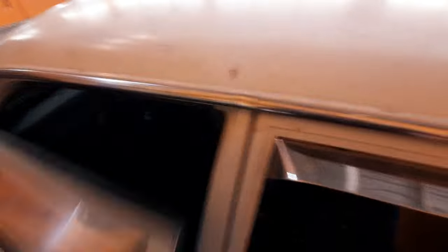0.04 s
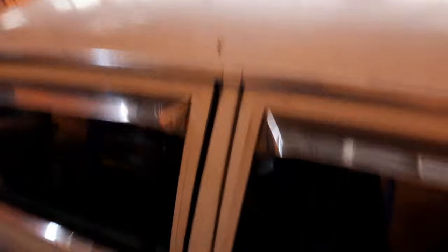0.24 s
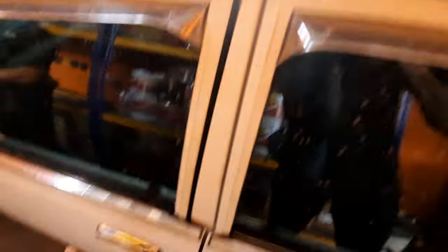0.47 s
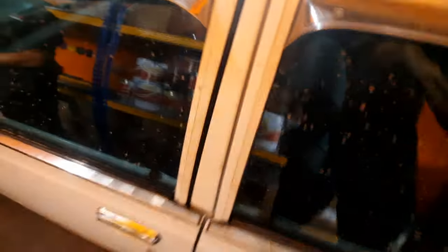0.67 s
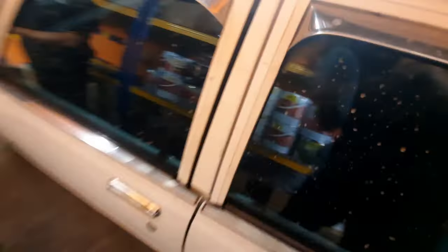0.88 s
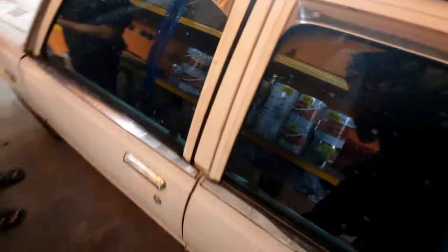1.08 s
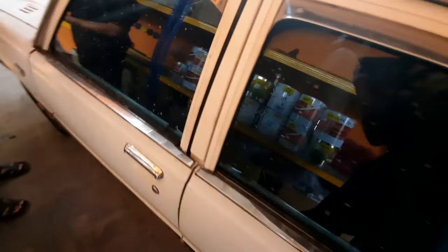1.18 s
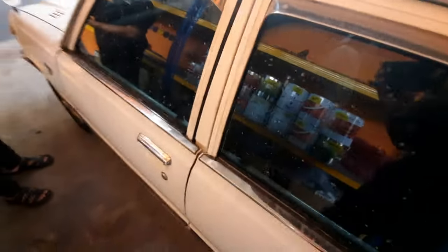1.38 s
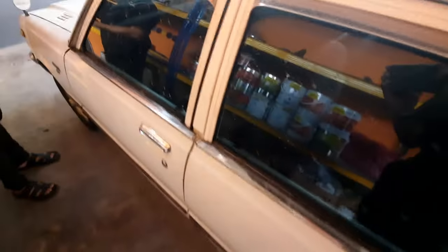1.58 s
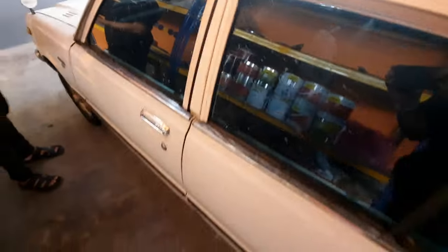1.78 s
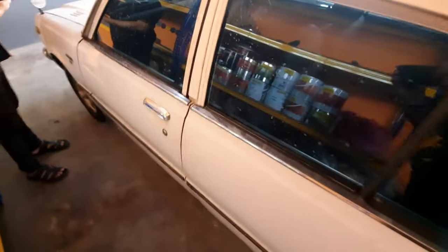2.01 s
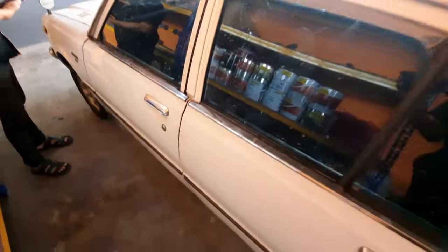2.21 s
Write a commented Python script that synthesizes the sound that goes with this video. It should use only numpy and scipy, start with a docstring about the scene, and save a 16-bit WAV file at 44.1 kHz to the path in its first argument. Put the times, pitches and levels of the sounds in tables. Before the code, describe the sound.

One solid car door slam with a latch clack, ringing out through a big hall.

```python
"""Old car door slammed in a workshop

One slam, close by: the latch snaps over its striker, the door lands on the body and booms,
and loose parts rattle. The large hall rings on over rumble, hiss and a low machine hum,
with a few faint scuffs and ticks."""
import sys
import numpy as np
from scipy import signal
from scipy.fft import rfft, irfft
from scipy.io import wavfile

SR = 44100
rng = np.random.default_rng(int(sys.argv[2]) if len(sys.argv) > 2 else 0)


def bounce(signal):
    """Save signal as a 16-bit WAV file at the path given by the first command-line argument."""
    frames = np.transpose(np.atleast_2d(signal))
    limited = np.clip(frames, -1, 1)
    pcm = np.round(limited * 32767).astype(np.int16)
    wavfile.write(sys.argv[1], SR, pcm)


N = 99225
T, HZ = np.arange(N) / SR, np.fft.rfftfreq(N, 1 / SR)
BODY_PAN_DB, ROOM_PAN_DB = 2, 2  # left over right


def amp(db):
    """Decibels to gain."""
    return 10 ** (np.asarray(db) / 20)


def unit(x):
    """Scales to rms 1."""
    return x / np.sqrt(np.mean(x ** 2) + 1e-20)


def read(points, hz):
    """Reads a table on a log-frequency axis."""
    f, value = np.transpose(points)
    return np.interp(np.log(hz + 1), np.log(f), value)


def pan(db):
    """Stereo gains, the left louder by db."""
    return amp([[db / 2], [-db / 2]])


def add(mix, start, sound):
    """Mixes a sound in at a start in seconds."""
    part = mix[:, max(round(start * SR), 0):][:, :sound.shape[-1]]
    part += sound[..., :part.shape[1]]


def noise(colour, width):
    """Stereo noise with a given spectrum and width, rms 1."""
    mid, side = colour * np.exp(2j * np.pi * rng.random((2, len(HZ))))
    share = amp(read(width, HZ))
    return unit(irfft(np.array([mid + share * side, mid - share * side]) / np.hypot(1, share), N))


def waver(hz):
    """A random drift up to about hz, rms 1."""
    return unit(irfft(np.exp(-(HZ / hz) ** 2 + 2j * np.pi * rng.random(len(HZ))), N))


def rise(seconds):
    """Soft attack."""
    return 1 - np.exp(-T / seconds)


def fade(t60):
    """Falls by 60 dB every t60 seconds."""
    return np.exp(-np.log(1000) * T / t60)


def die_away(x, t60s):
    """Lets each octave decay at its own speed."""
    centres, spectrum = np.geomspace(32, 16384, 10), rfft(x)
    out = np.zeros_like(x)
    for hz in centres:
        band = read([(centre, centre == hz) for centre in centres], HZ)
        out += irfft(spectrum * band, N) * fade(read(t60s, hz))
    return out


def hump(hz, octaves):
    """A broad spectral peak."""
    return np.exp(-.5 * (np.log2((HZ + 1) / hz) / octaves) ** 2)


# Colour of the room tone. Each row: frequency in Hz, relative level in dB.
ROOM_COLOUR = [(15, -54.5), (25, -22), (71, -12), (113, -2), (144, -13.5), (178, -8.5), (240, -14),
               (331, -15.5), (537, -24), (648, -21), (1240, -28), (2230, -27), (6920, -40), (9300, -46),
               (15500, -39)]
# Its fader rides. Each row: time in seconds, rumble in dB, hiss in dB.
ROOM_LEVELS = [(0, -44, -53.5), (.13, -42, -48), (.5, -43.5, -53.5), (.98, -48.5, -61), (1.12, -52, -54.5),
               (1.42, -49, -58.5), (1.54, -50, -55.5), (1.66, -45, -53), (1.9, -43.5, -51.5),
               (2.02, -44.5, -51.5), (2.25, -44, -49.5)]
# Stereo width of the hall. Each row: frequency in Hz, side against mid in dB.
HALL_WIDTH = [(80, -22), (300, -12.5), (1000, 1), (3000, 0), (14000, 0)]


def room_tone():
    """The workshop's bed of rumble and distant hiss."""
    times, rumble_db, hiss_db = np.transpose(ROOM_LEVELS)
    colour = amp(read(ROOM_COLOUR, HZ))
    low_share = 1 / (1 + (HZ / 760) ** 4)  # crossover at 760 Hz
    rumble = amp(np.interp(T, times, rumble_db)) * noise(colour * np.sqrt(low_share), HALL_WIDTH)
    hiss = amp(np.interp(T, times, hiss_db)) * noise(colour * np.sqrt(1 - low_share), HALL_WIDTH)
    return rumble + hiss


# Tones of the machine. Each row: pitch in Hz, relative level in dB.
HUM_TONES = [(117, 3), (327, -10), (644, -16), (2300, -25)]
# The hum's fader ride. Each row: time in seconds, level in dB.
HUM_LEVELS = [(0, -45.5), (.1, -47), (.16, -39), (.3, -49), (1.0, -53), (1.5, -50.5), (1.8, -46.5),
              (2.25, -46)]


def machine_hum(drift_hz=7.34, flutter=0.49, rate_hz=13.05):
    """A machine hums in the hall, each tone wavering in level and pitch."""
    tones = np.zeros(N)
    for hz, db in HUM_TONES:
        level = amp(db) * (1 + flutter * waver(rate_hz))
        pitch = hz + drift_hz * waver(rate_hz)
        tones += level * np.sin(2 * np.pi * np.cumsum(pitch) / SR)
    return amp(np.interp(T, *np.transpose(HUM_LEVELS))) * unit(tones)


# Hits of the latch and loose parts. Each row: start in seconds, level in dB, t60 in seconds,
# pan to the left in dB, treble tilt in dB per octave.
LATCH_HITS = [(0.1828, -49, .025, 4, 0), (0.1955, -46, .025, 2, 0), (0.2036, -12, .035, 3, 1),
              (0.2068, -13, .03, 1, 1.5), (0.2110, -17, .025, 2, 3), (0.2215, -15, .02, 1, -2.5),
              (0.2295, -23, .05, 0, -1), (0.2685, -30, .03, 0, -4), (0.3020, -28, .05, 0, -5),
              (0.2485, -18.5, .045, 2, -1), (0.2745, -26, .022, 0, -3), (0.2960, -22, .022, 0, -1.5),
              (0.3328, -30.5, .022, 1, .5)]
# Colour of the steel's crack. Each row: frequency in Hz, relative level in dB.
LATCH_COLOUR = [(200, -11), (900, -4), (2000, 1.5), (3300, -5), (4500, 2.5), (7000, -1.5), (9300, -10),
                (11600, -2.5), (12800, -9), (14400, -12), (15800, -29)]
# Ring of the steel. Each row: pitch in Hz, relative level in dB, t60 in seconds.
LATCH_MODES = [(2170, -21, .14), (3830, -24, .12), (4600, -20, .1), (5268, -18, .12), (6200, -21, .1),
               (7220, -21, .1), (7860, -22, .1), (11450, -21, .06), (14390, -22, .08)]
# Stereo width up close. Each row: frequency in Hz, side against mid in dB.
CLOSE_WIDTH = [(80, -9), (400, -7.5), (1000, -3.5), (2500, 4), (6000, -5), (14000, -5.5)]


def latch(ring_db=-4):
    """The latch and loose parts clack, steel on steel, each hit leaving a thin ring."""
    out = np.zeros((2, N))
    treble_octaves = np.log2(np.maximum(HZ / 1024, 1))
    for start, db, t60, pan_db, tilt in LATCH_HITS:
        colour = amp(read(LATCH_COLOUR, HZ) + tilt * treble_octaves)
        crack = fade(t60) * noise(colour, CLOSE_WIDTH)
        ring = sum(amp(mode_db) * fade(mode_t60) * np.sin(2 * np.pi * (hz * T + rng.random((2, 1))))
                   for hz, mode_db, mode_t60 in LATCH_MODES)
        add(out, start, amp(db) * pan(pan_db) * rise(0.00024) * (crack + amp(ring_db) * ring))
    return out


# The door meets seal, striker and body, then rocks. Each row: start in seconds, panel level in dB,
# ring level in dB, knock level in dB, knock pitch in Hz.
DOOR_BLOWS = [(0.1831, -29.5, -48.5, -19.5, 292), (0.2047, -14, -35.5, -23, 700),
              (0.2208, -10, -21, -8, 840), (0.2300, -16, -19, -4, 324), (0.2579, -17, -29, -7.5, 134),
              (0.2775, -20.5, -33, -14.5, 260)]
# Colour of the sheet metal. Each row: frequency in Hz, relative level in dB.
PANEL_COLOUR = [(30, -20), (70, -3), (170, -4.5), (320, 1.5), (480, -3.5), (650, -9.5), (1000, -12.5),
                (1600, -11.5), (3000, -20.5), (8000, -38)]
# Its decay. Each row: frequency in Hz, t60 in seconds.
PANEL_DECAY = [(60, 0.54), (300, 0.19), (900, 0.12), (4000, 0.18)]
# Modes of door and body, one list each: pitch in Hz, relative level in dB, t60 in seconds.
BODY_HZ = [68, 97, 139, 211, 272, 315, 337, 405, 521, 856, 902, 1053, 1195, 1287, 1469]
BODY_DB = [-19, -13, -9, -8, -4, -1.5, -7, -9.5, 0, -15.5, -11, -23, -20, -22.5, -15]
BODY_T60 = [.3, .3, 0.43, 0.31, .4, 0.49, .35, 0.34, 0.23, 0.21, 0.26, .35, 0.25, .3, 0.19]


def door(knock_peak_cycles=0.78):
    """Each blow gives a hard knock, shakes the sheet metal and rings the same body modes."""
    out = np.zeros((2, N))
    ring = sum(amp(db) * fade(t60) * np.sin(2 * np.pi * hz * T)
               for hz, db, t60 in zip(BODY_HZ, BODY_DB, BODY_T60))
    for start, panel_db, ring_db, knock_db, knock_hz in DOOR_BLOWS:
        panel = die_away(noise(amp(read(PANEL_COLOUR, HZ)), CLOSE_WIDTH), PANEL_DECAY)
        metal = rise(0.00091) * (amp(panel_db) * panel + amp(ring_db) * ring)
        age = T * knock_hz / knock_peak_cycles  # 1 at the top of the envelope
        knock = age ** 2 * np.exp(1 - age ** 2) * np.sin(2 * np.pi * knock_hz * T)
        add(out, start, metal + amp(knock_db) * knock)
    return out * pan(BODY_PAN_DB)


# The weight under the slam, and its low echo back from the hall. Each row: start in seconds, level in dB, pitch
# in Hz, length in seconds.
AIR_SWELLS = [(0.205, -16.5, 79.8, 0.043), (0.248, -17.5, 67.6, 0.051), (0.284, -16, 63.5, .055),
              (0.47, -27.5, 66, .055)]


def booms(pitch_sag=0.16):
    """Air in cabin and hall swells for a few low cycles, sinking in pitch."""
    out = np.zeros((2, N))
    for start, db, hz, length in AIR_SWELLS:
        progress = np.arange(0, 1, 1 / (length * SR))
        pitch = hz * (1 + pitch_sag * (.5 - progress))
        add(out, start, amp(db) * np.sin(np.pi * progress) * np.sin(2 * np.pi * np.cumsum(pitch) / SR))
    return out * pan(BODY_PAN_DB)


# Colour of the reverb. Each row: frequency in Hz, level in dB.
HALL_COLOUR = [(40, -2.5), (130, 1), (300, -3.5), (700, -2), (1500, -8.5), (3000, -6), (6000, -10.5),
               (10000, -7.5), (15000, -15)]
# Its decay. Each row: frequency in Hz, t60 in seconds.
HALL_DECAY = [(60, 0.87), (250, 0.91), (1000, 1.25), (3000, 0.99), (6000, 1.52), (12000, 0.22)]


def hall(send, wet_db=-5, predelay_s=.01, far_wall_s=.17, far_wall_db=-14.5):
    """The diffuse tail of the workshop, renewed by an echo from the far wall."""
    colour, tail = amp(read(HALL_COLOUR, HZ)), np.zeros((2, N))
    for delay, db in [(predelay_s, wet_db), (far_wall_s, wet_db + far_wall_db)]:
        add(tail, delay, amp(db) * die_away(noise(colour, HALL_WIDTH), HALL_DECAY) * rise(0.011))
    tail *= np.sqrt(np.mean(colour ** 2)) / np.linalg.norm(fade(1))
    return signal.fftconvolve(send, tail, axes=1)[:, :N]


# Each row: start in seconds, level in dB, centre in Hz, t60 in seconds.
FAINT_TICKS = [(0.64, -64, 12150, 0.036), (1.029, -49.5, 14330, 0.017), (1.088, -52, 4900, 0.057),
               (1.487, -56, 3600, .05), (1.576, -48.5, 2150, .05)]
# Each row: start in seconds, level in dB, centre in Hz, length in seconds.
FAINT_SCUFFS = [(1.149, -60.5, 4900, 0.07), (1.56, -56.5, 1650, 0.094), (1.64, -61.5, 5940, 0.075),
                (1.86, -51.5, 2680, 0.12), (2.233, -44.5, 4170, 0.026)]


def ticks_and_scuffs():
    """Small noises beside the car: ticks start sharply, scuffs swell and fade."""
    out = np.zeros((2, N))
    for start, db, hz, t60 in FAINT_TICKS:
        add(out, start, amp(db) * fade(t60) * noise(hump(hz, octaves=0.44), HALL_WIDTH))
    for start, db, hz, length in FAINT_SCUFFS:
        swell = np.sin(np.pi * np.minimum(T / length, 1))
        add(out, start, amp(db) * swell * noise(hump(hz, octaves=0.85), HALL_WIDTH))
    return out


def scene(boom_send_db=-2):
    """The slam, its reverb and the room around it."""
    slam, boom = latch() + door(), booms()
    reverb = hall(slam + amp(boom_send_db) * boom)
    background = pan(ROOM_PAN_DB) * (room_tone() + machine_hum())
    return slam + boom + reverb + background + ticks_and_scuffs()


def record(dry, cutoff_hz=15850):
    """Rounds off peaks near full scale, then cuts the very top of the treble."""
    rounded = dry / (1 + dry ** 6) ** (1 / 6)
    lowpass = signal.firwin(511, cutoff_hz, window=("kaiser", 9), fs=SR)
    return signal.oaconvolve(rounded, lowpass[None], "same")


dry = scene()
out = record(dry)
bounce(out)
```